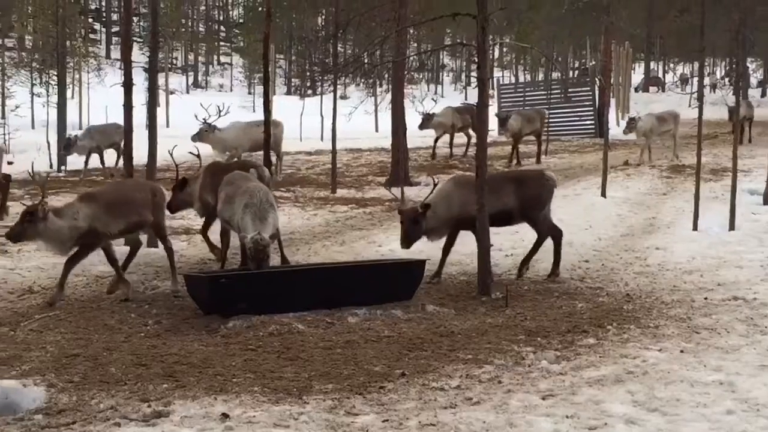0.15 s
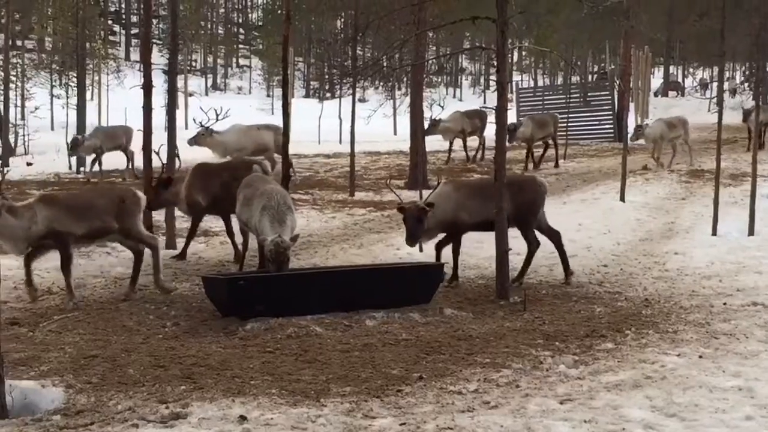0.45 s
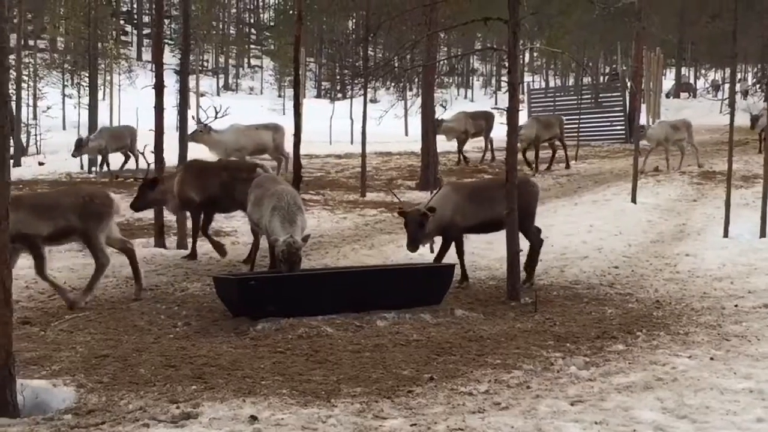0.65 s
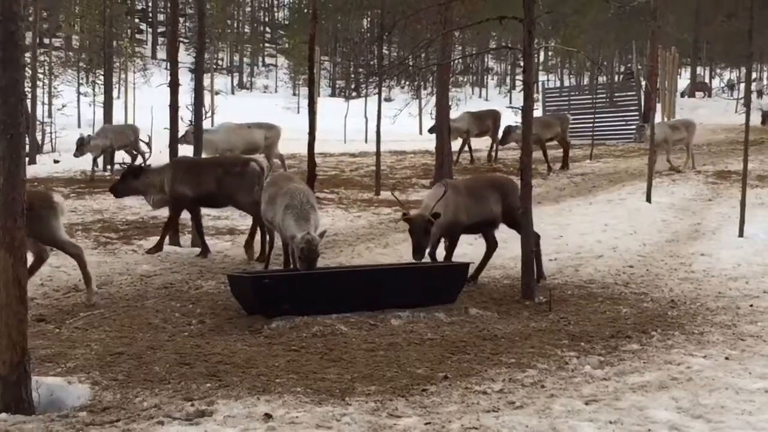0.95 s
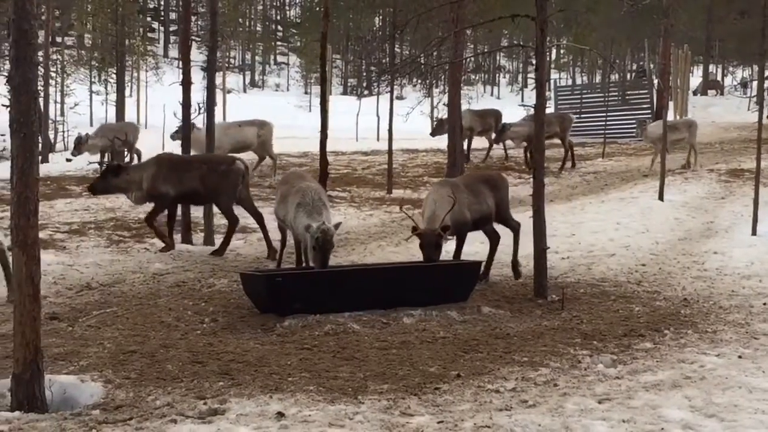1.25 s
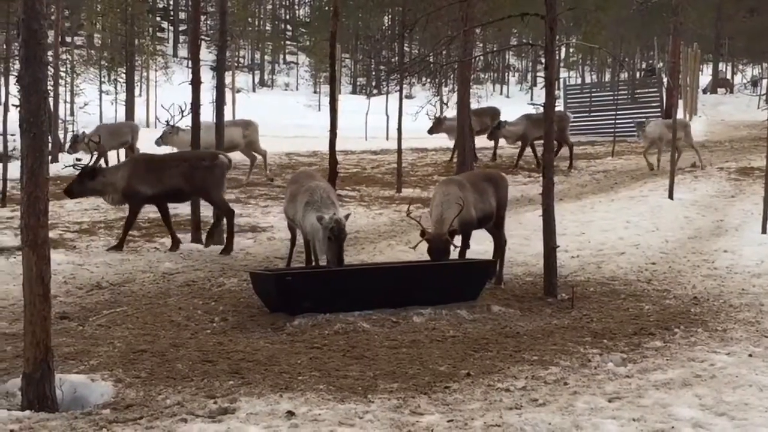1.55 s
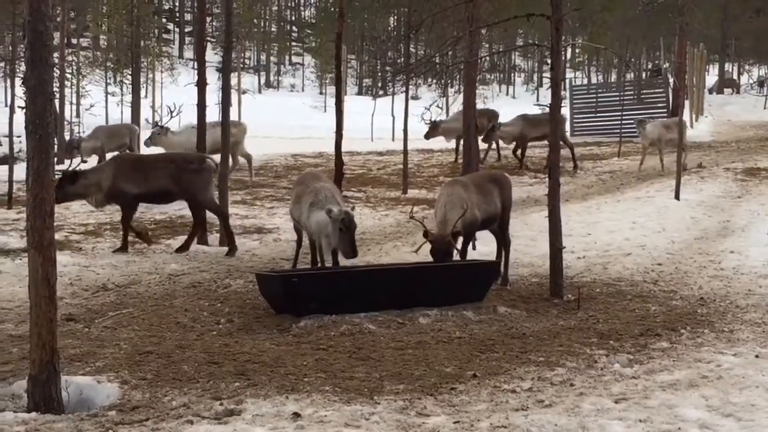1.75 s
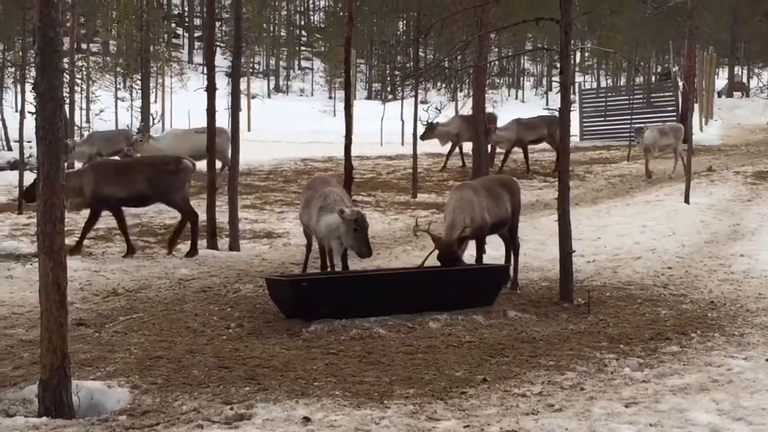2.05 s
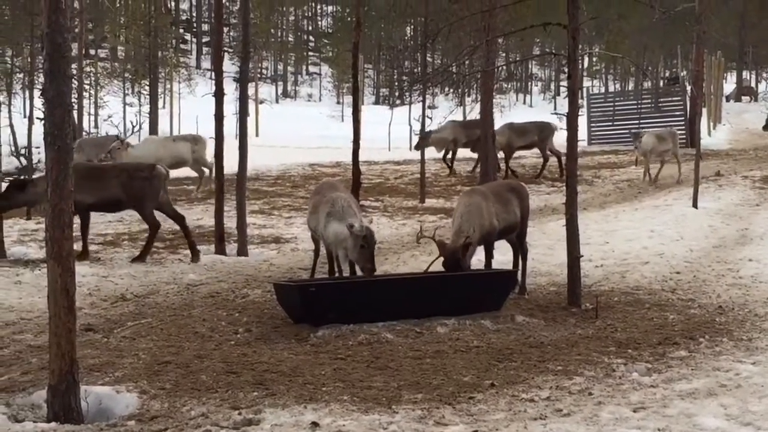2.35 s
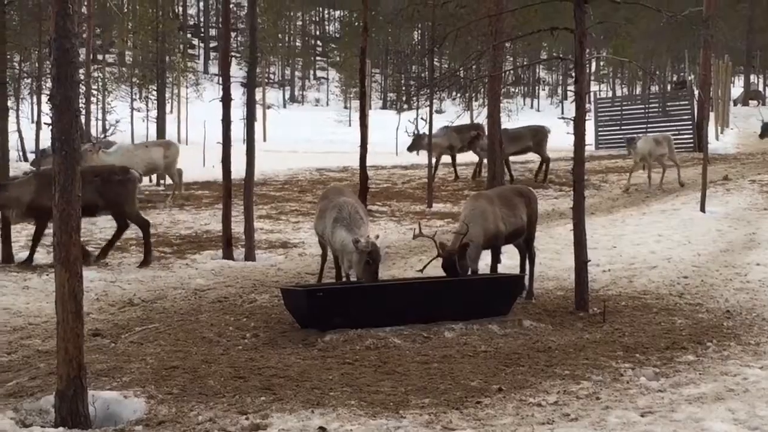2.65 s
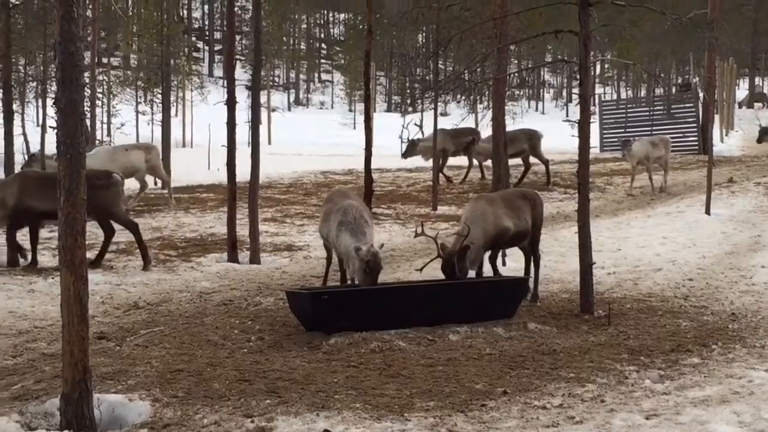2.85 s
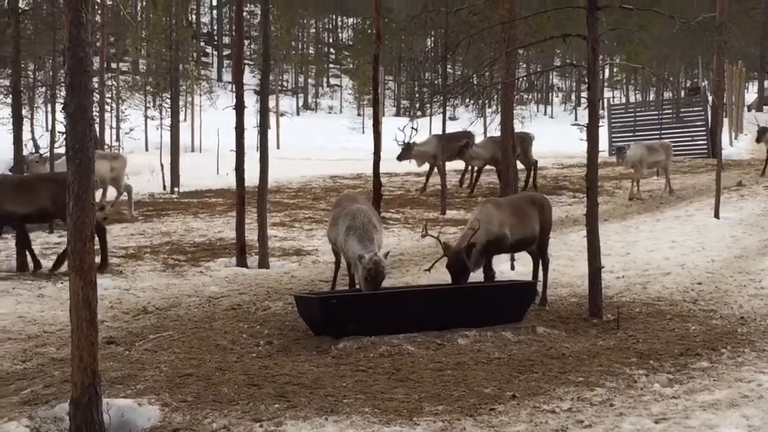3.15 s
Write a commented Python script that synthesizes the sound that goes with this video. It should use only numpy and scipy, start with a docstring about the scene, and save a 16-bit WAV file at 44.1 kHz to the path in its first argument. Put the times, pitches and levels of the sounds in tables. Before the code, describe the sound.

Dull little collar bell rattles and rings irregularly over faint hoof thuds and snow crunch.

```python
"""A small bell clanks and rings unevenly over hoof thuds, snow crunch and quiet forest air.
It is sheet metal, on the collar of a reindeer feeding at a trough in a snowy pine wood.
The clapper strikes and rattles: a few decaying modes sing on, many upper modes clang briefly, and neck fur
muffles the ring. Shaped noise makes hooves, snow and air; a decaying noise tail is the trunks' faint echo."""
import sys
import numpy as np
from scipy import signal
from scipy.fft import rfft, irfft, next_fast_len
from scipy.io import wavfile
from scipy.ndimage import map_coordinates

SR = 44100
rng = np.random.default_rng(int(sys.argv[2]) if len(sys.argv) > 2 else 0)


def dump_mix(stems):
    """Bounce the given channels to the path in sys.argv[1] as a 16-bit WAV at rate SR."""
    frames = np.atleast_2d(stems).T  # one column per channel
    limited = np.clip(frames, -1, 1)  # hard clip at full scale
    pcm = np.round(limited * 32767).astype(np.int16)
    wavfile.write(sys.argv[1], SR, pcm)


N = 145530
T = np.arange(N) / SR  # s
HUM_HZ, SECOND_HZ = 957.7, 1841.6  # the two lowest singing modes
TOP_HZ = 15200  # upper band limit

# spectrum of trodden snow: frequency_hz, relative level_db
SNOW_SPECTRUM = [(300, -11), (2500, 3.5), (15000, -8)]


def amp(db):
    """Level and amplitude: 20 dB is a factor of ten."""
    return 10 ** (np.asarray(db) / 20)


def unit(x):
    """Normalisation by signal power: scale to rms 1."""
    return x / np.sqrt(np.mean(x ** 2) + 1e-20)


def filtered(x, gain):
    """Linear filtering: multiply the spectrum of x by a gain that is a function of frequency."""
    size = next_fast_len(len(x) + 8192)
    hz = np.fft.rfftfreq(size, 1 / SR) + 1  # the offset keeps zero out of logs and divisions
    return irfft(rfft(x, size) * gain(hz), size)[:len(x)]


def colour(x, points):
    """Spectral shaping: interpolate (Hz, dB) points over log frequency, then scale to rms 1."""
    hz, db = np.transpose(points)
    return unit(filtered(x, lambda f: amp(np.interp(np.log(f), np.log(hz), db))))


def noise(size):
    """White noise: independent samples carry equal power at all frequencies."""
    return rng.standard_normal(size)


def band_noise(size, hz, q):
    """Resonance: noise is strongest near one frequency, in a band that narrows as q rises."""
    return unit(filtered(noise(size), lambda f: 1 / (1 + (q * (f / hz - hz / f)) ** 2)))


def fade(t, t60):
    """Exponential damping: full level until t = 0, then 60 dB down every t60 seconds."""
    return np.exp(-np.log(1000) * np.maximum(t, 0) / t60)


def sine(hz, t):
    """Simple harmonic motion: a sine of random phase with rms 1."""
    return np.sqrt(2) * np.sin(2 * np.pi * (hz * t + rng.random()))


def wobble(per_s, t=T):
    """Slow random modulation: a smooth curve through per_s random values a second."""
    return map_coordinates(noise(int(t[-1] * per_s) + 4), [t * per_s])


def add(track, s, sound):
    """Superposition: mix a sound in at time s."""
    part = track[max(round(s * SR), 0):][:len(sound)]
    part += sound[:len(part)]


def air():
    """Broadband noise: forest hiss, uneven rustle of the herd and lumpy rumble of distant treading."""
    # forest hiss: frequency_hz, relative level_db
    hiss_spectrum = [(30, -24), (300, 0), (3000, -3), (15000, -19.5)]
    # distant treading: frequency_hz, relative level_db
    rumble_spectrum = [(25, -27), (60, -1.5), (110, -0.5), (700, -26.5)]
    # rustle of the herd before its random sway: time_s, level_db
    rustle_levels = [(0, -74), (.8, -66.5), (1.15, -70.5), (2.3, -64.5), (3.3, -64.5)]
    hiss_db, rumble_db = -66.5, -67
    sway_db, lump_db, sway_per_s = 2.5, 3, 14

    hiss = amp(hiss_db) * colour(noise(N), hiss_spectrum)
    rustle_db = np.interp(T, *np.transpose(rustle_levels)) + sway_db * wobble(sway_per_s)
    rustle = colour(noise(N), SNOW_SPECTRUM) * amp(rustle_db)
    lumps = noise(N) * amp(lump_db * wobble(sway_per_s))
    return hiss + rustle + amp(rumble_db) * colour(lumps, rumble_spectrum)


def snow_crunch(grain_t60):
    """Granular noise: random grains of snow give way under far hooves in short decaying bursts."""
    grains_per_s, grain_spread, crunch_db = 110, 0.86, -69.5
    grains = (rng.random(N) < grains_per_s / SR) * np.exp(grain_spread * noise(N))
    bursts = np.abs(signal.fftconvolve(grains, fade(T[:SR // 3], grain_t60))[:N])
    return amp(crunch_db) * colour(bursts * noise(N), SNOW_SPECTRUM)


def herd():
    """Impact and friction: damped noise makes thuds and clicks, swelling noise makes scuffs."""
    # hoof falls and bumps on the trough: start_s, level_db, pitch_hz
    thuds = [(0.547, -48.5, 140), (1.059, -49, 142), (1.412, -54, 224), (2.141, -53.5, 93),
             (3.129, -56, 282)]
    # scuffs in snow and feed: start_s, length_s, level_db, centre_hz
    scuffs = [(1.038, 0.042, -53, 904), (1.406, 0.034, -53.5, 840), (2.565, 0.034, -59, 3180),
              (2.783, 0.2, -57.5, 380)]
    # sharp little clicks of the walking herd: start_s, level_db
    clicks = [(.739, -55.5), (1.349, -55), (1.658, -49), (2.959, -56)]
    thud_attack_s, thud_t60, thud_q = 0.0014, 0.13, 2.4
    scuff_rise, scuff_q = 0.235, 1.0  # the rise is a share of the scuff's length
    click_t60 = 0.017  # s
    out, t = np.zeros(N), T[:SR // 3]

    thud_envelope = fade(t, thud_t60) * (1 - np.exp(-t / thud_attack_s))
    for s, db, hz in thuds:
        add(out, s, amp(db) * band_noise(len(t), hz, thud_q) * thud_envelope)
    for s, length, db, hz in scuffs:
        size = int(length * SR)
        swell = np.interp(np.arange(size) / size, [0, scuff_rise, 1], [0, 1, 0])
        add(out, s, amp(db) * band_noise(size, hz, scuff_q) * swell)
    for s, db in clicks:
        add(out, s, amp(db) * colour(noise(len(t)), SNOW_SPECTRUM) * fade(t, click_t60))
    return out + snow_crunch(click_t60)


def trunks(x):
    """Diffuse scattering: the trunks return a decaying tail, mostly treble."""
    echo_t60, corner_hz = 0.39, 1500
    t = T[:SR // 2]
    tail = filtered(noise(len(t)), lambda f: f ** 2 / (f ** 2 + corner_hz ** 2)) * fade(t, echo_t60)
    return signal.fftconvolve(x, tail / np.linalg.norm(tail))[:N]


def flutter(t):
    """Amplitude modulation: the gain of one mode wavers as the bell tumbles."""
    depth_db, per_s = 5, 58.4
    return amp(depth_db * wobble(per_s, t))


def chatter():
    """Repeated contact: the clapper skids, one touch followed by tiny, ever weaker ones."""
    count, mean_delay_s, size = 8, 0.005, 0.7
    delays = rng.exponential(mean_delay_s, count)
    strengths = size * noise(count) * fade(delays, 20 * mean_delay_s)
    touches = np.bincount((delays * SR).astype(int), strengths)
    touches[0] += 1  # the first contact
    return touches


def singing(t, facing, hum_db, hum_t60, second_db, third_db, shrill_db):
    """Modal vibration: four modes ring; the touching clapper stiffens the wall and sharpens the hum."""
    attack_s = 0.00115
    bend, contact_s = 0.15, 0.0036  # initial share of sharpening and its time constant
    twin_hz, twin_db = 1866.3, -10  # the bell is not quite round: a twin beats with the second mode
    second_life = 0.67  # the second mode's decay time over the hum's
    third_hz, third_hold_s, third_t60 = 3412, 0.044, 0.27
    shrill_hz, shrill_hold_s, shrill_t60 = 5545, 0.015, 0.11

    bent = t + bend * contact_s * (1 - np.exp(-t / contact_s))
    hum = amp(hum_db) * sine(HUM_HZ, bent) * fade(t, hum_t60) * facing
    pair = sine(SECOND_HZ, t) + amp(twin_db) * sine(twin_hz, t)
    second = amp(second_db) * pair * fade(t, second_life * hum_t60)
    third = amp(third_db) * sine(third_hz, t) * fade(t - third_hold_s, third_t60) * flutter(t)
    shrill = amp(shrill_db) * sine(shrill_hz, t) * fade(t - shrill_hold_s, shrill_t60) * flutter(t)
    return (hum + second + third + shrill) * (1 - np.exp(-t / attack_s))


def clang(t, weak, tilt_db=-0.5):
    """Impact excitation: upper modes, crack and buzz; a harder contact tilts them to the treble."""
    # clanging modes before scatter and tilt: frequency_hz, level_db, t60_s
    upper_modes = [(2315, -4.5, .24), (2433, -3.5, .15), (3208, -8, .2), (4000, -1.5, .12), (4312, -7, .17),
                   (6277, -4.5, .13), (6713, -9, .26)]
    # highest modes, all short-lived, before detuning: frequency_hz
    high_modes = [6850, 7340, 8160, 8900, 9090, 9580, 10280, 12500, 12910, 13500, 14500]
    # buzz of the clapper against the wall, before tilt: frequency_hz, relative level_db
    buzz_spectrum = [(780, -35), (1080, 10), (1450, -13.5), (2300, 4), (4000, -2), (15000, -13)]
    scatter_db, detune = 4, 0.0016  # random spread of each mode's level and of its frequency (a share)
    tilt_centre_hz = 5500
    high_db, high_t60 = -12, 0.14
    shimmer_db, shimmer_t60 = -15.5, 0.17  # a crowd of weak modes, mixed anew at every strike
    drag_db, drag_s = 7.5, 0.0046  # initial drive-level change in dB and its time constant
    buzz_db, buzz_t60 = -9.5, 0.18
    crack_db, crack_t60 = -3.5, 0.0068  # the first hard contact
    onset_s = 0.014  # the ring's level is set over its first moments

    def slope(hz):
        return amp(tilt_db * np.log2(np.maximum(hz, SECOND_HZ) / tilt_centre_hz))

    def mode(hz, db):
        level = amp(db + scatter_db * rng.normal()) * slope(hz)
        return level * sine(hz * (1 + detune * rng.normal()), t)

    ring = sum(mode(hz, db) * fade(t, t60) * flutter(t) for hz, db, t60 in upper_modes)
    ring += sum(mode(hz, high_db) * flutter(t) for hz in high_modes) * fade(t, high_t60)
    ring += sum(mode(hz, shimmer_db) for hz in weak) * fade(t, shimmer_t60)
    ring *= amp(drag_db * np.exp(-t / drag_s))  # an extra-loud onset
    ring = signal.fftconvolve(ring, chatter())[:len(t)]
    no_bass = signal.butter(2, HUM_HZ, "highpass", fs=SR, output="sos")
    ring = signal.sosfilt(no_bass, ring)  # the clang carries little below the hum

    buzz = unit(filtered(colour(noise(len(t)), buzz_spectrum), slope))
    buzz *= amp(buzz_db) * fade(t, buzz_t60)
    crack = unit(filtered(noise(len(t)), lambda hz: slope(hz) * (hz > HUM_HZ)))
    crack *= amp(crack_db) * fade(t, crack_t60)
    return ring / np.std(ring[:int(onset_s * SR)]) + buzz + crack


def bell():
    """Contact damping: each strike takes over the singing from the last, and the fur absorbs ring."""
    # clapper strikes, levels before turning and muffling: start_s, hum_db, hum_t60_s, second_db,
    # third_db, shrill_db, clang_db, clang_tilt_db_per_octave
    strikes = [(0.0, -42, 0.75, -48, -64, -63, -51.5, -3.5), (0.0271, -50, 2.6, -48, -72, -57.5, -51, -2),
               (.198, -42, 0.15, -44, -57, -46.5, -37.5, -4.5),
               (.217, -51.5, 1, -48.5, -65, -54.5, -45, -3),
               (0.354, -46, 0.512, -47.5, -48, -47.5, -31.5, -2),
               (0.5411, -37, 2, -47, -57.5, -59, -41, -2.5),
               (0.591, -35.5, .72, -51.5, -64, -66.5, -44, -0.5),
               (0.6546, -43.5, 0.62, -50, -94, -64, -43.5, -3.5),
               (.8578, -43, 1.13, -50.5, -50, -44.5, -38.5, -1),
               (.967, -40.5, 0.92, -49, -59, -66, -39, 4.5),
               (1.1935, -46.5, 2.1, -49.5, -50.5, -49, -35.5, -1),
               (1.241, -45, 0.49, -46, -59, -59, -48, -2.5), (1.473, -50, .4, -62.5, -44, -62, -37, -4),
               (1.481, -41.5, 0.48, -50.5, -53.5, -43, -40.5, 2.5),
               (1.5527, -52.5, 0.42, -43.5, -61.5, -45.5, -43.5, -3),
               (1.824, -37, 0.504, -42, -55.5, -61, -36, -4.5),
               (2.0884, -46.5, 3.8, -43, -52, -41, -36, 2.5),
               (2.2165, -37, 0.62, -46, -53, -49.5, -35.5, 3.5),
               (2.4269, -40, 2.6, -51, -74, -58, -40.5, -1),
               (2.4879, -50.5, 0.53, -51, -69, -55.5, -47, 0.5),
               (2.699, -39, 2.55, -51.5, -55.5, -43, -38.5, -2.5),
               (2.7846, -36.5, 0.27, -41.5, -51.5, -65, -41, 0.5),
               (2.8298, -39.5, 0.6, -52, -56, -65, -47, -4.5),
               (2.9971, -35, 0.57, -46.5, -58.5, -64, -42, -3.5),
               (3.0757, -42, 2.1, -55, -76, -84, -55.5, -1.5)]
    # the clapper only grazes the wall and leaves the low ring alone: start_s, clang_db
    grazes = [(0.043, -53), (1.563, -40), (1.6038, -48.5), (1.909, -58.5), (3.144, -58)]
    # the bell brushes the neck and loses ring: start_s, loss_db
    muffles = [(.05, 11), (1.273, 19.5), (1.872, 5), (2.512, 9.5), (3.241, 14)]
    # the hum dips and swells back as the bell turns: centre_s, depth_db
    turns = [(0.163, 15), (1.083, 8), (2.147, 18), (3.118, 6.5)]
    turn_s, muffle_s = 0.025, 0.036  # width of a dip, time for a muffle to close
    handover_s = 0.0034  # time constant at which a new contact stops the old ring
    weak_count = 72
    out, t = np.zeros(N), T[:SR // 2]
    clang_t = t[:len(t) // 2]

    places = (np.arange(weak_count) + rng.random(weak_count)) / weak_count
    weak = SECOND_HZ + (TOP_HZ - SECOND_HZ) * places
    ends = [row[0] for row in strikes[1:]] + [T[-1]]
    for (s, *low, clang_db, tilt_db), end in zip(strikes, ends):
        now = s + t
        dip_db = sum(db * np.exp(-np.square((now - turn) / turn_s)) for turn, db in turns)
        ring = singing(t, amp(-dip_db), *low)
        ring *= np.exp(-np.maximum(now - end, 0) / handover_s)
        add(ring, 0, amp(clang_db) * clang(clang_t, weak, tilt_db))
        for touch, loss_db in muffles:
            if s < touch < end:
                ring *= amp(-loss_db * np.clip((now - touch) / muffle_s, 0, 1))
        add(out, s, ring)
    for s, db in grazes:
        add(out, s, amp(db) * clang(clang_t, weak))
    return out


def scene():
    """Superposition of direct sound, echo and background: bell and herd among the trees."""
    echo_db = -16.5
    near = bell() + herd()
    return (near + amp(echo_db) * trunks(near) + air())[None]


def record(dry):
    """Band limiting: a steep low-pass removes what lies above the top frequency."""
    return np.array([filtered(x, lambda f: 1 / np.sqrt(1 + (f / TOP_HZ) ** 200)) for x in dry])


dry = scene()
out = record(dry)
dump_mix(out)
```